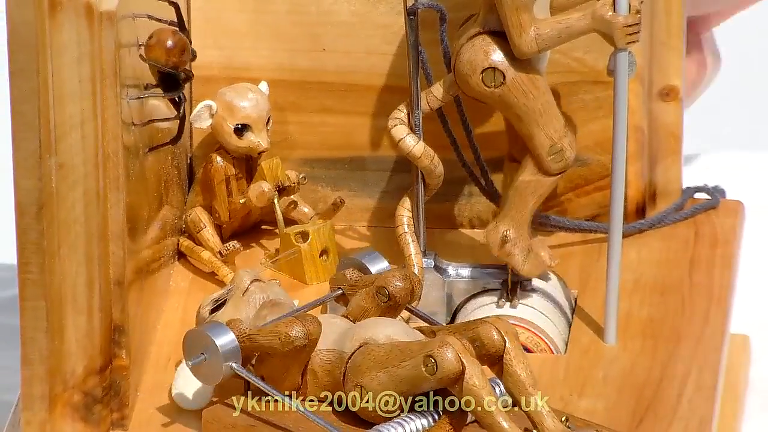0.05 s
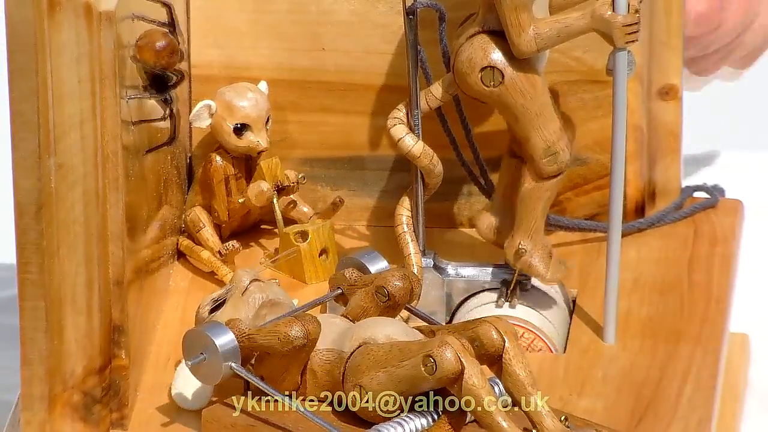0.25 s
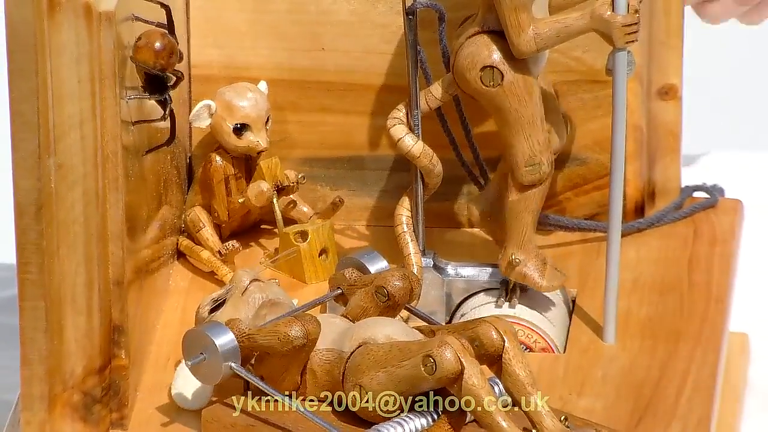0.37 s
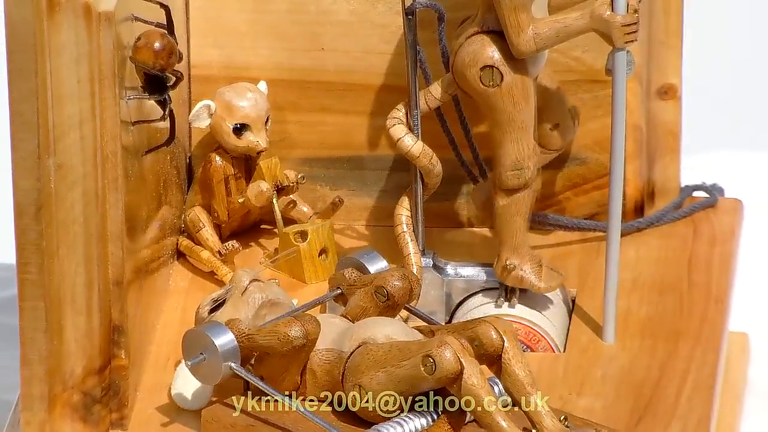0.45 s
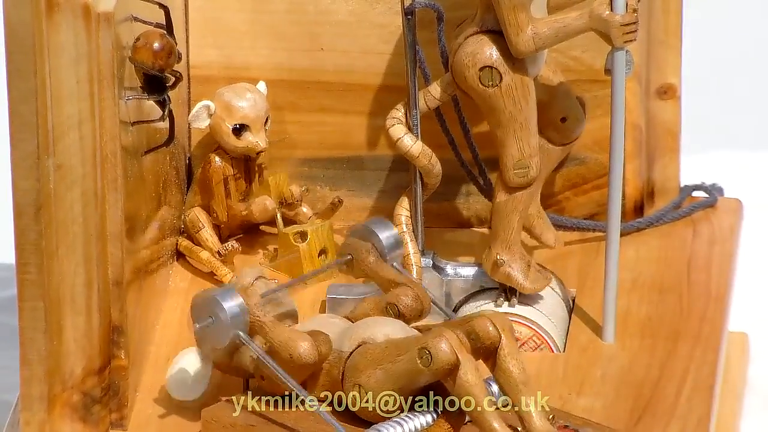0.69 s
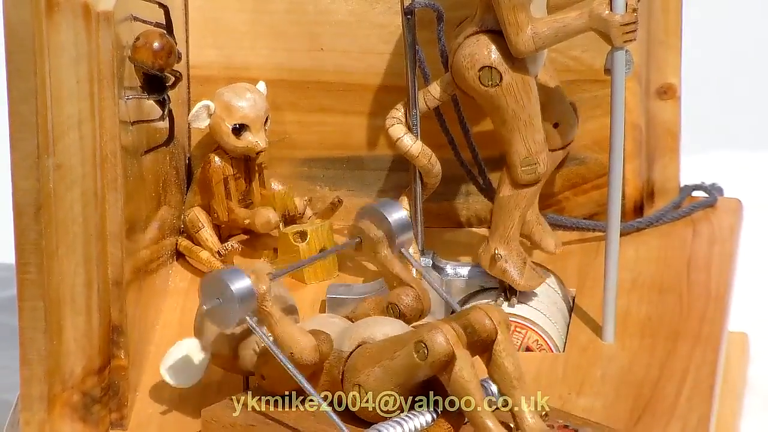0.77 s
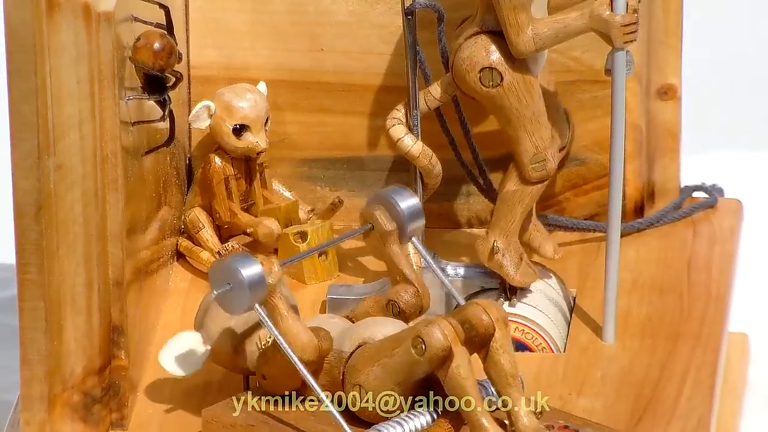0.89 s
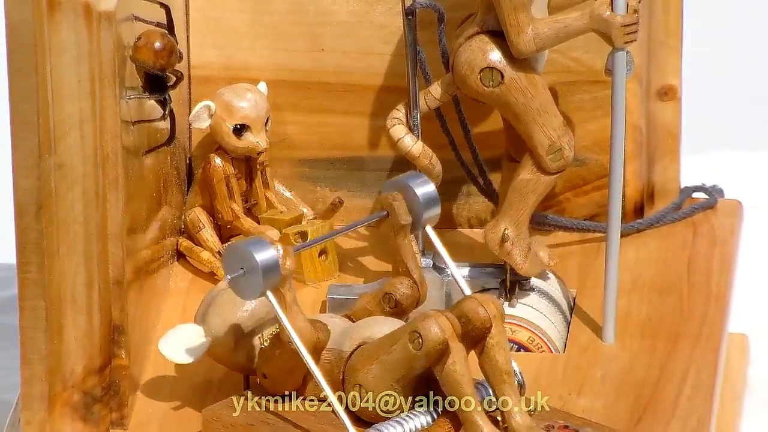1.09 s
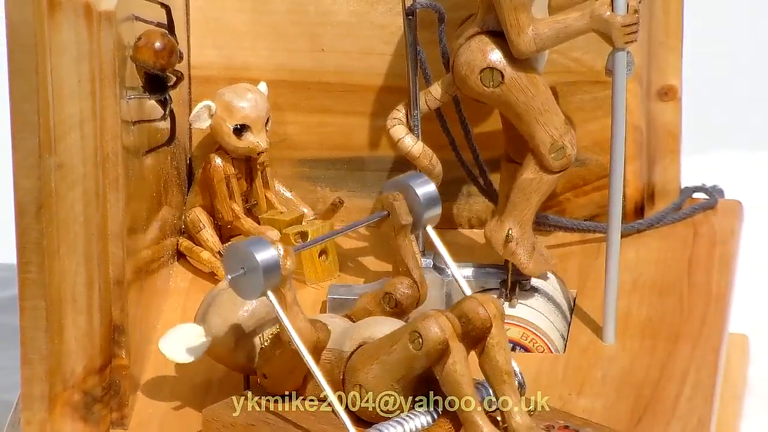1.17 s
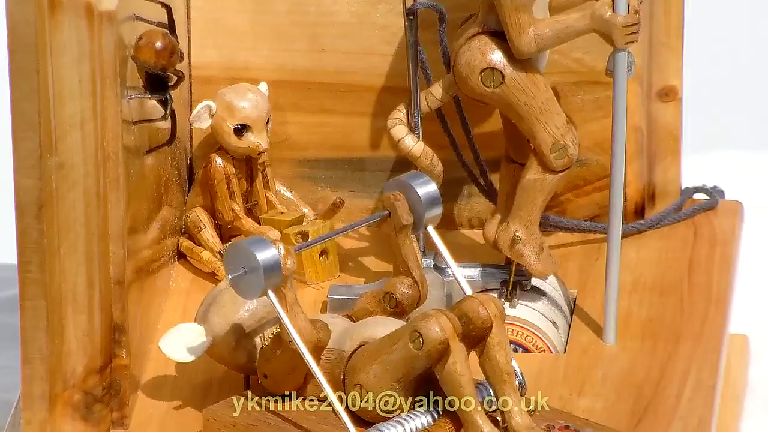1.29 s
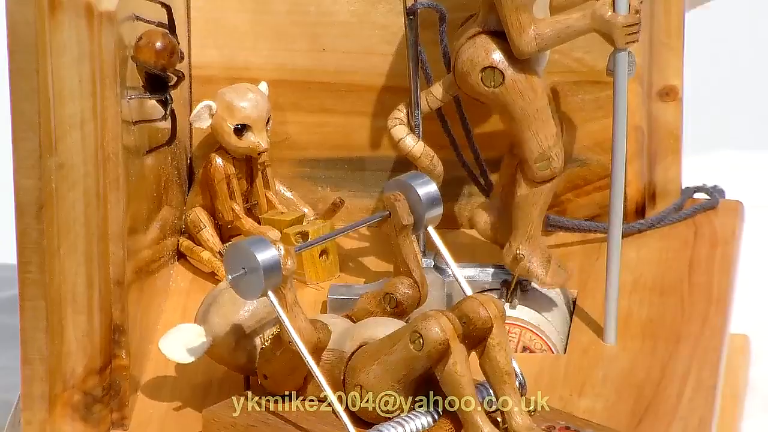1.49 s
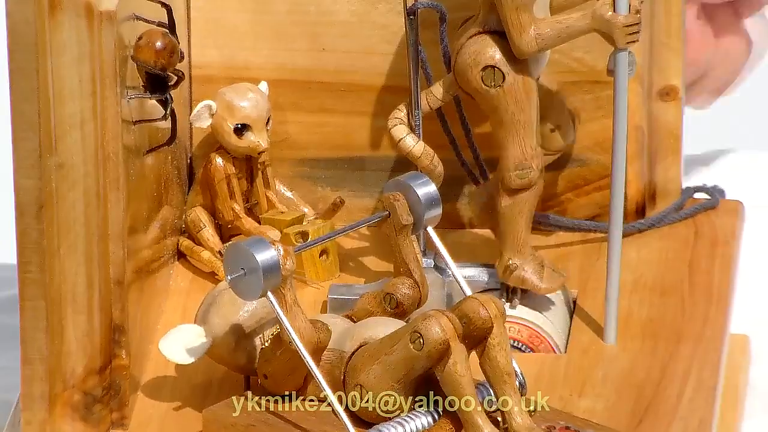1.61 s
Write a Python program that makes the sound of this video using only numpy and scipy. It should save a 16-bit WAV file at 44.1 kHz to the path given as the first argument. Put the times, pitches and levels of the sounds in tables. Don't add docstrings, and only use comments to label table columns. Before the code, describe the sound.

A hand-cranked wooden mechanical figure clacks, close up in a small room. Faint ticks and scraping rods lead to the loudest sharp clack at 0.2 s, with quick bounces. After a lull, clacks come near 0.6, 0.74, 0.94 and 1.04 s, with small ticks between; weaker ones follow at 1.34 and 1.64 s. Soft hiss and very faint, short high focus-motor whines lie underneath.

```python
import sys
import numpy as np
from scipy import signal
from scipy.fft import rfft, irfft
from scipy.io import wavfile

SR = 44100
rng = np.random.default_rng(int(sys.argv[2]) if len(sys.argv) > 2 else 0)


def to_linear_factor(level_db):
    exponent = np.asarray(level_db, float) / 20
    return 10 ** exponent


def store_pcm(level_fs):
    pcm = np.round(np.clip(level_fs, -1, 1) * 32767).astype(np.int16)
    wavfile.write(sys.argv[1], SR, np.atleast_2d(pcm).T)


N = 72765
EDGE_HZ = 15380


def evened(x):
    return x / np.sqrt(np.mean(x ** 2) + 1e-20)


def read(points, hz):
    f, value = np.transpose(points)
    return np.interp(np.log(hz + 1), np.log(f + 1), value)


def add(mix, s, sound):
    part = mix[round(s * SR):][:len(sound)]
    part += sound[:len(part)]


def colour(x, spectrum):
    hz = np.fft.rfftfreq(len(x), 1 / SR)
    top_hz = min(spectrum[-1][0] * 1.03, EDGE_HZ)
    inside = (hz >= spectrum[0][0]) & (hz <= top_hz)
    return evened(irfft(rfft(x) * to_linear_factor(read(spectrum, hz)) * inside, len(x)))


def causal(x, gain):
    n = np.arange(len(x))
    cepstrum = irfft(np.log(gain + 1e-5), len(x))
    fold = np.where(n < len(x) // 2, 2, 0) - (n == 0)
    return irfft(rfft(x) * np.exp(rfft(cepstrum * fold)), len(x))


# (frequency [Hz], level [dB per Hz])
LOW_HISS = [(5, 13), (50, -7), (110, -15), (230, 8), (295, -8.5), (380, 13.5), (420, 0.5)]
# (frequency [Hz], level [dB per Hz])
PREAMP_HISS = [(420, -7.5), (1200, -6), (3000, -6.5), (5200, -9), (6200, -7), (7800, -7.5), (12000, -11.5),
               (15000, -4.5)]
LOW_HISS_DB, PREAMP_HISS_DB = -92, -69


def hiss():
    low, high = rng.standard_normal((2, N))
    return to_linear_factor(LOW_HISS_DB) * colour(low, LOW_HISS) + to_linear_factor(PREAMP_HISS_DB) * colour(high, PREAMP_HISS)


def friction(curve, spectrum, per_s, spread_db):
    happens = rng.random(N) < per_s / SR
    slips = to_linear_factor(spread_db * np.minimum(rng.exponential(1, N), 4)) * happens
    slips = signal.lfilter([1], [1, -.99], slips) * rng.standard_normal(N)
    s, db = np.transpose(curve)
    return colour(slips, spectrum) * to_linear_factor(np.interp(np.arange(N) / SR, s, db))


# (time [s], level [dB])
SCRAPE = [(0, -77), (.05, -72.5), (.19, -60), (.3, -74.5), (.46, -71), (.49, -65), (.58, -63.5),
          (.8, -64.5), (.9, -73.5), (.93, -65), (1.1, -74.5), (1.26, -71), (1.3, -60), (1.38, -62.5),
          (1.45, -81.5), (1.56, -67), (1.65, -71.5)]
# (frequency [Hz], level [dB])
PORT = [(900, -61), (2500, -13.5), (5400, -6.5), (6080, -2.5), (6900, -9.5), (8300, -27.5), (12000, -37.5),
        (15300, -47.5)]


def rods():
    return friction(SCRAPE, PORT, per_s=1000, spread_db=2)


# (time [s], level [dB])
RUB = [(0, -98), (.05, -66), (.09, -81), (.13, -63.5), (.3, -73), (.35, -77), (.55, -70.5), (.63, -63.5),
       (.67, -62), (.82, -65), (.89, -73), (1.05, -67), (1.15, -84), (1.27, -74.5), (1.36, -61),
       (1.42, -67), (1.5, -75), (1.6, -72)]
# (frequency [Hz], level [dB per Hz])
RUB_COLOUR = [(300, -28), (400, -9.5), (600, -4.5), (1100, -5), (2200, -3.5), (4000, -15.5), (7000, -33.5)]


def cams():
    return friction(RUB, RUB_COLOUR, per_s=1100, spread_db=4)


# (delay [s], level [dB])
ECHOES = [
    (.004, -15),
    (.0065, -18),
    (.0175, -15),
    (.029, -18),
]
# (frequency [Hz], time to fall 60 dB [s])
ROOM = [(500, 0.22), (1500, .3), (3000, 0.23), (6000, 0.23), (10000, 0.24)]
ROOM_DB, ROOM_RISE_S = -2.5, 0.0031


def room(strike, noise):
    t = np.arange(len(noise)) / SR
    f, frame_s, z = signal.stft(noise[::-1], SR, nperseg=128)
    fade = to_linear_factor(-60 * frame_s / read(ROOM, f)[:, None])
    tail = signal.istft(z * fade, SR, nperseg=128)[1][:len(t)]
    tail = tail * (1 - np.exp(-t / ROOM_RISE_S))
    tail = tail * np.minimum((t[-1] - t) / 0.022, 1)
    wet = to_linear_factor(ROOM_DB) * tail * np.linalg.norm(strike) / np.linalg.norm(tail)
    for s, echo_db in ECHOES:
        add(wet, s, to_linear_factor(echo_db) * strike)
    return wet


# (frequency [Hz], level [dB])
BOX = [(250, -41.5), (420, -18), (650, -12.5), (1050, -0.5), (1450, 0), (2200, -8.5), (4000, -21.5)]
BOX_LATE_DB = -6.5
STRIKE_S, WOOD_WIDTH_OCT, TRIM_DB = 0.0017, .3, -1.5
PIN_HZ, PIN_WIDTH_HZ, PIN_DB = 6280, 114, 10.5


def hit(db, wood_hz, wood_db, knock_db, wet_db=0):
    noise = rng.standard_normal(8192)
    t, hz = np.arange(len(noise)) / SR, np.fft.rfftfreq(len(noise), 1 / SR)
    strike = np.sign(noise) * t / STRIKE_S * np.exp(-(t / STRIKE_S) ** 2)
    strike = causal(strike, 1 / (abs(rfft(strike)) + 1))
    wet = room(strike, noise)

    octaves = np.log2((hz + 1) / wood_hz)
    wood = to_linear_factor(wood_db) / (1 + (octaves / WOOD_WIDTH_OCT) ** 2) ** 1.15
    wood = wood / (1 + (hz / 7000) ** 8)
    pin = 1 + to_linear_factor(PIN_DB) / (1 + ((hz - PIN_HZ) / PIN_WIDTH_HZ) ** 2)
    low_cut = (hz / (hz + 900)) ** 6
    hard = to_linear_factor(read(PORT, hz)) ** 2 * pin * low_cut + wood ** 2
    box = to_linear_factor(knock_db + read(BOX, hz)) ** 2

    direct = causal(strike, np.sqrt(hard + to_linear_factor(BOX_LATE_DB) ** 2 * box))
    around = to_linear_factor(wet_db) * causal(wet, np.sqrt(hard + box))
    return to_linear_factor(db + TRIM_DB) / abs(direct).max() * (direct + around)


def play_hits(rows, *shares):
    out = np.zeros(N)
    for s, *row in rows:
        add(out, s, hit(*row, *shares))
    return out


TICK_KNOCK_DB = -17
# (time [s], peak level [dB], wood pitch [Hz], wood share [dB])
TICKS = [(0.0433, -56.5, 1780, 25), (0.0524, -45.5, 5150, -4), (0.0913, -50, 5100, -5),
         (0.126, -45.5, 2760, 1), (.159, -45, 2760, 4), (.175, -50, 2250, 23), (0.192, -40, 2960, 7),
         (.479, -48, 2900, 11), (0.4865, -53, 2900, -19), (.5457, -51, 5200, -10), (0.555, -50.5, 5260, 10),
         (0.6546, -61, 1260, -6), (0.6741, -46.5, 2370, 26), (0.7119, -39, 2330, 8.5),
         (0.758, -38, 2070, -17), (.7952, -45.5, 2450, -8), (0.83, -55.5, 2000, 2),
         (0.862, -54, 2200, -2.5), (0.918, -50, 4380, -6), (.9367, -52, 1920, 12), (.961, -37.5, 2370, 18),
         (.9935, -42, 2320, 4), (1.2376, -56.5, 4460, 4), (1.27, -61, 3900, 8), (1.3492, -44.5, 2920, 17),
         (1.4003, -54.5, 1900, 11), (1.5687, -54, 1500, 3.5)]


def ticks():
    return play_hits(TICKS, TICK_KNOCK_DB, -7)


STEP_S, STEP_RISE_S, STEP_FADE_DB = 0.032, 0.0058, -14
MOTOR_HZ = 959.1
# (time [s], level [dB])
STEPS = [(0.064, -65), (.363, -75), (0.429, -77.5), (.497, -65), (.996, -65), (1.164, -76), (1.231, -79),
         (1.397, -64), (1.464, -67.5), (1.561, -75), (1.631, -66.5)]
# (multiple of the motor pitch, level [dB])
MOTOR = [
    (2, -15),
    (3, 0.1),
    (4, -14),
    (6, -20),
]


def focus_motor():
    t, out = np.arange(0, STEP_S, 1 / SR), np.zeros(N)
    rise = np.minimum(t / STEP_RISE_S, 1)
    stop = np.minimum((STEP_S - t) / 0.0013, 1)
    shape = rise * to_linear_factor(STEP_FADE_DB * t / STEP_S) * stop
    whine = sum(to_linear_factor(db) * np.sin(2 * np.pi * k * MOTOR_HZ * t) for k, db in MOTOR)
    for s, db in STEPS:
        add(out, s - .002, to_linear_factor(db + 13) * shape * whine)
    return out


# (time [s], peak level [dB], wood pitch [Hz], wood share [dB], box knock share [dB])
CLACKS = [(.2069, -18, 3500, -18, -27), (.213, -35, 2470, 11, 3.5), (.226, -37.5, 1540, 2, 3),
          (.5889, -29, 4860, -8, -11), (.5905, -38.5, 2720, 19, -13), (.6046, -36.5, 2480, -17, 2.5),
          (.7355, -33.5, 2130, -9, -20), (.7395, -31, 2270, 0.5, -5.5), (.9443, -23.5, 3060, -13.5, -21),
          (1.035, -23, 3520, -0.5, -26), (1.0386, -32.5, 2540, -7.5, -26), (1.3162, -40, 3530, -3.5, 2.5),
          (1.3411, -31.5, 3730, -23, -30), (1.637, -37, 2570, -11, -5.5)]


def clacks():
    return play_hits(CLACKS)


# (time [s], peak level [dB], wood pitch [Hz], wood share [dB])
BOUNCES = [(.2082, -24, 4100, -18), (0.2217, -33, 3040, 1), (0.2257, -35, 3100, 1),
           (0.5917, -30, 4650, -21), (.7330, -39.5, 2080, -4), (0.738, -35, 3200, -2),
           (0.944, -26.5, 4000, -8.5), (.9495, -49.5, 2960, -10), (1.0480, -34.5, 5100, 8),
           (1.3453, -41, 5230, 4), (1.6400, -41.5, 4000, -10)]


def bounces():
    return play_hits(BOUNCES, TICK_KNOCK_DB, -5.5)


def scene():
    machine = rods() + cams() + ticks() + clacks() + bounces()
    camera = hiss() + focus_motor()
    return (machine + camera)[None]


def low_pass(x):
    return signal.sosfilt(signal.butter(12, 16110, fs=SR, output="sos"), x)


NOTCH_HZ, NOTCH_WIDTH_HZ, NOTCH_DEPTH = 910, 32.6, 0.93


def record(dry):
    hz = np.fft.rfftfreq(N, 1 / SR)
    dip = 1 - NOTCH_DEPTH / (1 + ((hz - NOTCH_HZ) / NOTCH_WIDTH_HZ) ** 2)
    edge = 1 / (1 + (hz / EDGE_HZ / 1.01) ** 200)
    mix = irfft(rfft(dry) * dip * edge, N)
    return low_pass(mix)


dry = scene()
out = record(dry)
store_pcm(out)
```